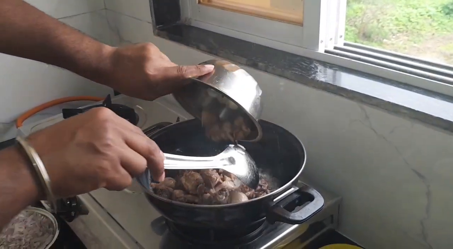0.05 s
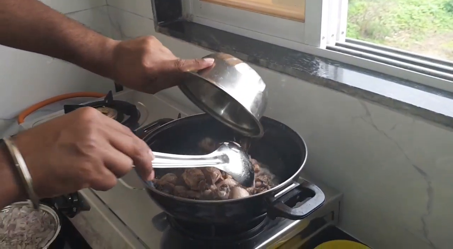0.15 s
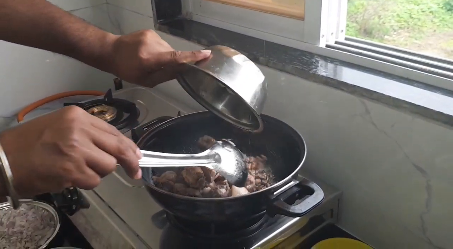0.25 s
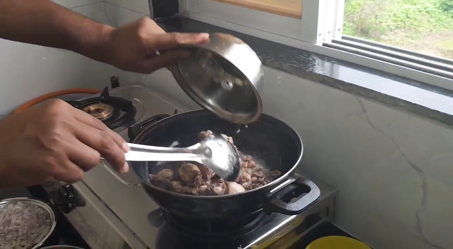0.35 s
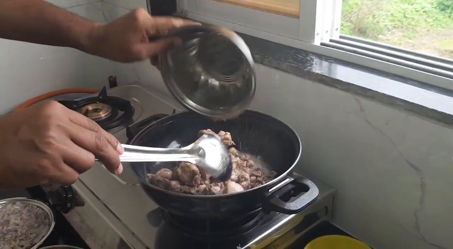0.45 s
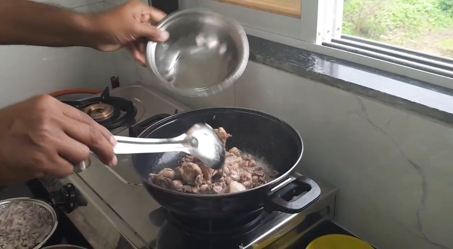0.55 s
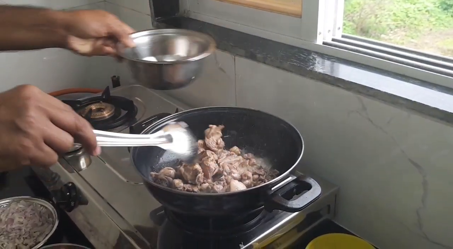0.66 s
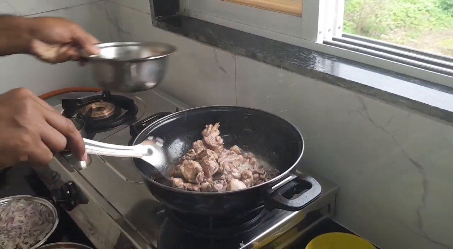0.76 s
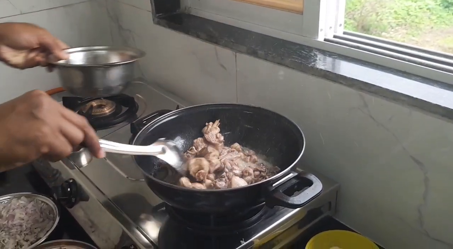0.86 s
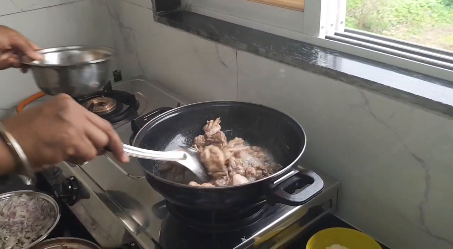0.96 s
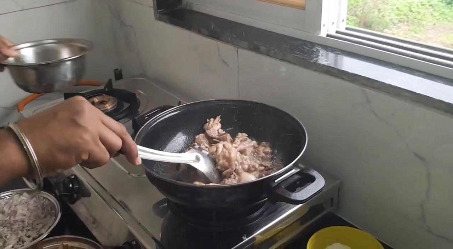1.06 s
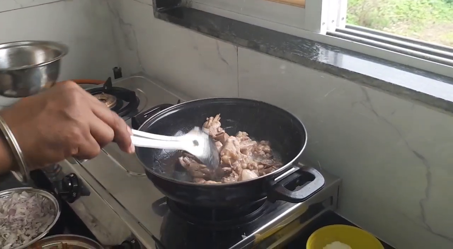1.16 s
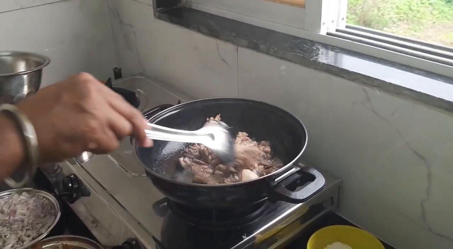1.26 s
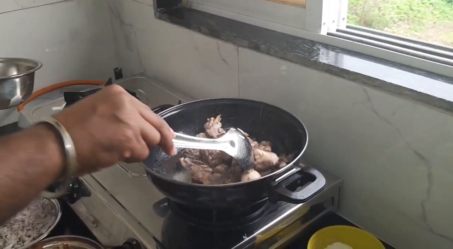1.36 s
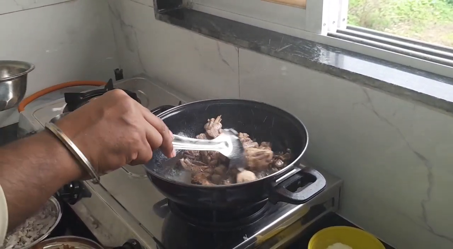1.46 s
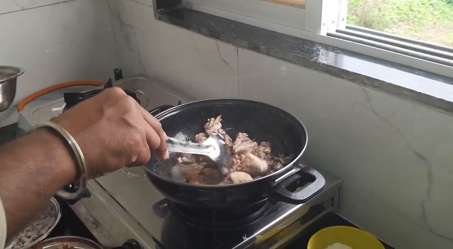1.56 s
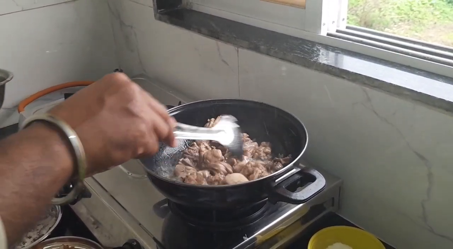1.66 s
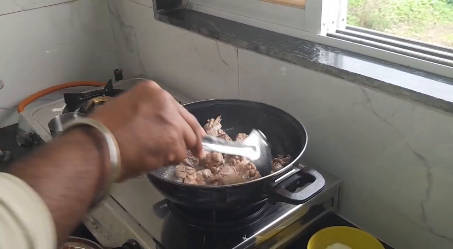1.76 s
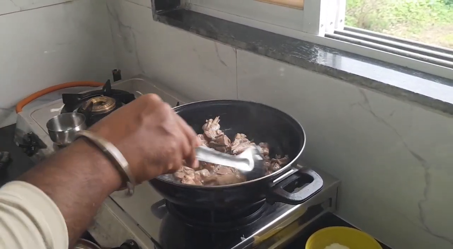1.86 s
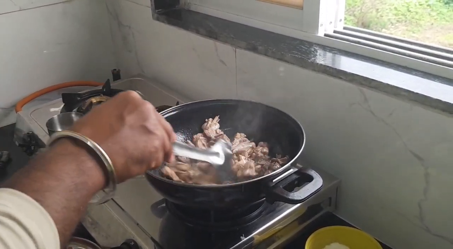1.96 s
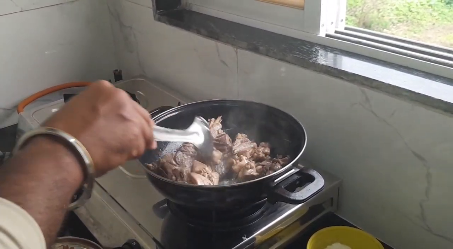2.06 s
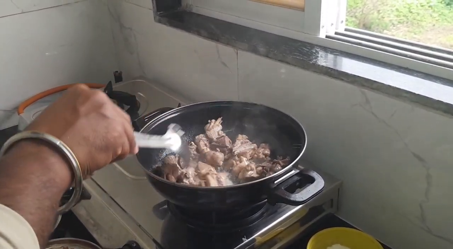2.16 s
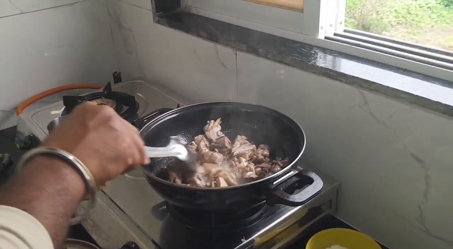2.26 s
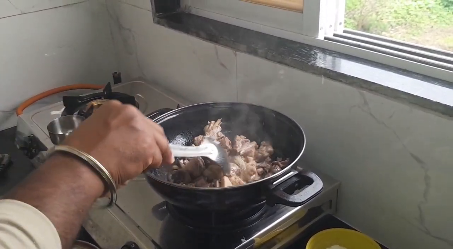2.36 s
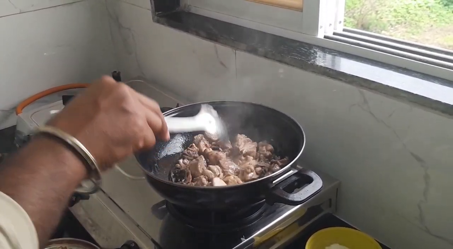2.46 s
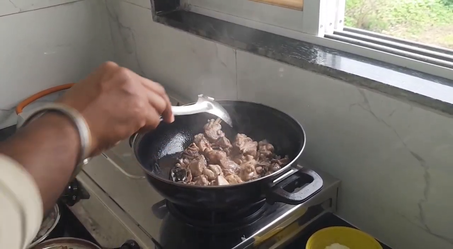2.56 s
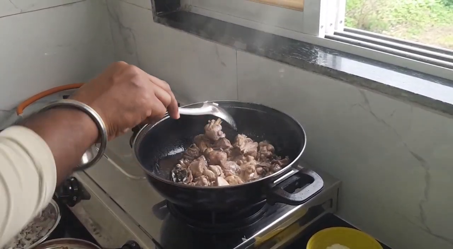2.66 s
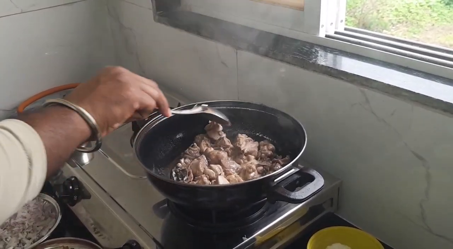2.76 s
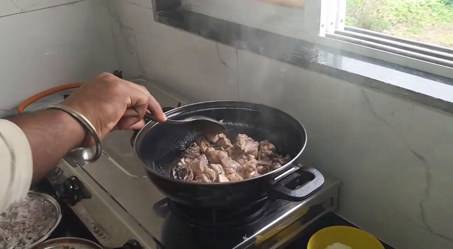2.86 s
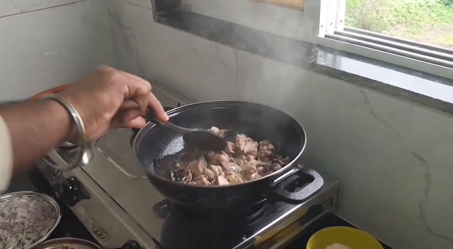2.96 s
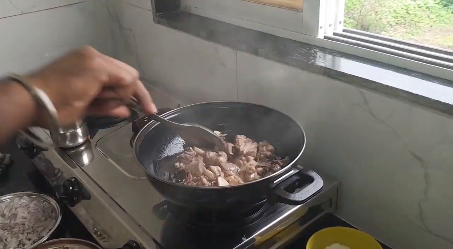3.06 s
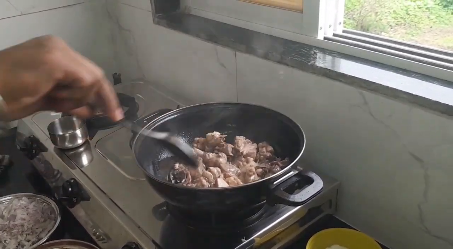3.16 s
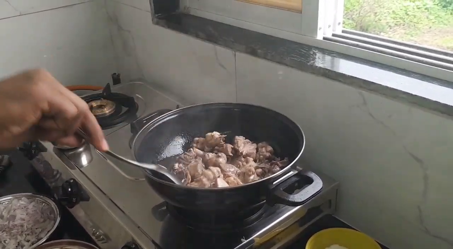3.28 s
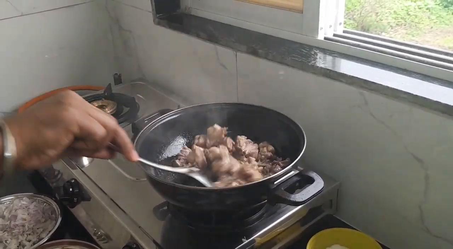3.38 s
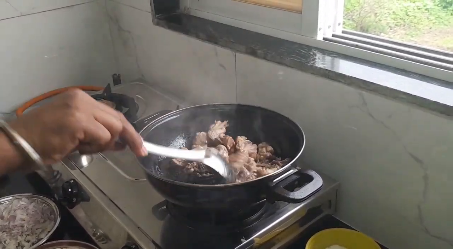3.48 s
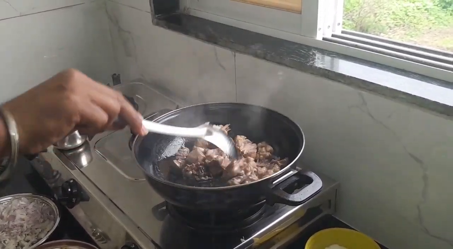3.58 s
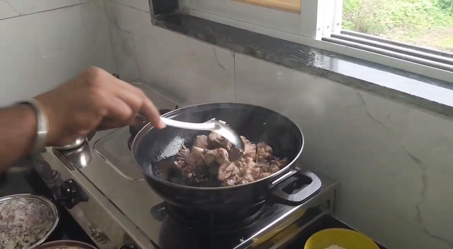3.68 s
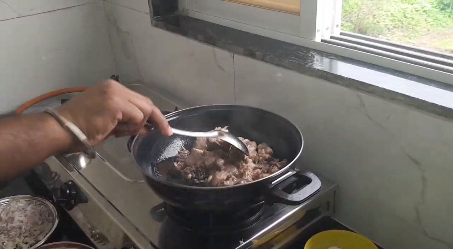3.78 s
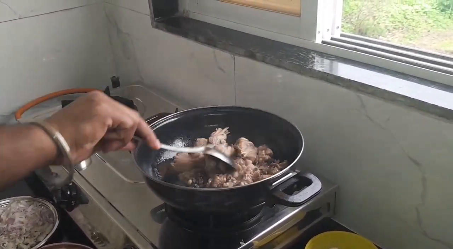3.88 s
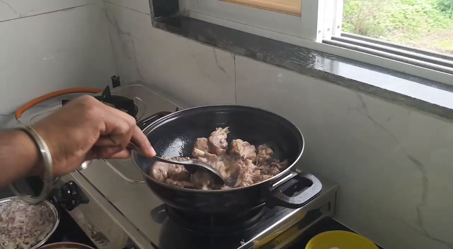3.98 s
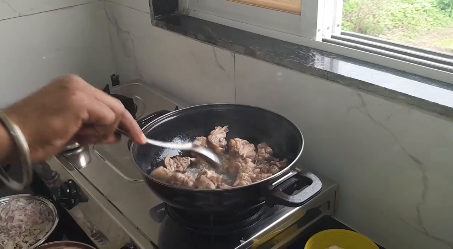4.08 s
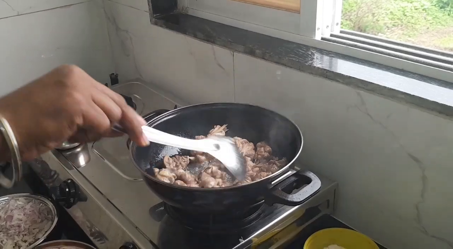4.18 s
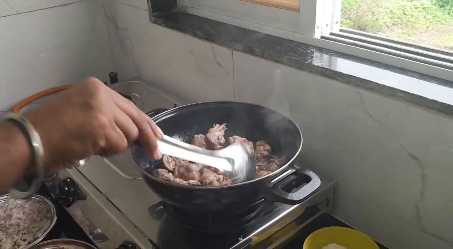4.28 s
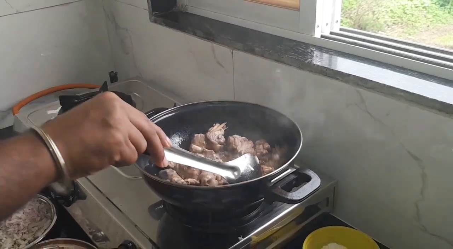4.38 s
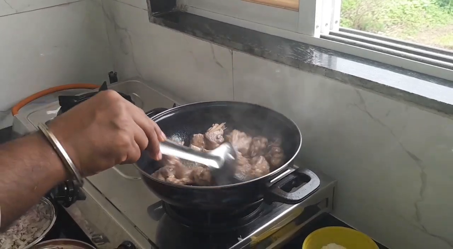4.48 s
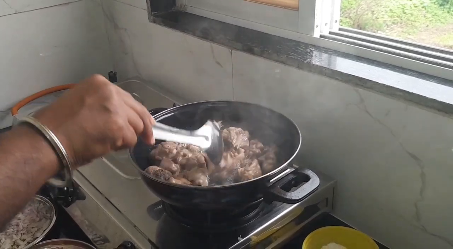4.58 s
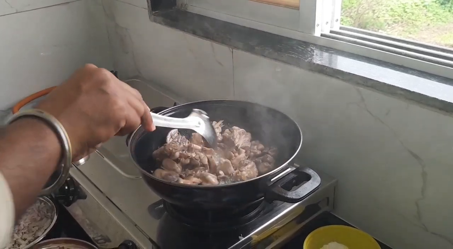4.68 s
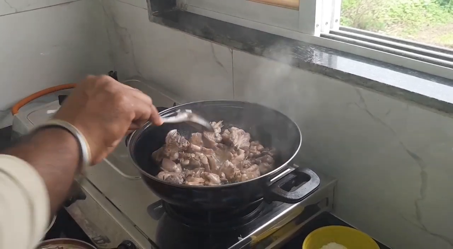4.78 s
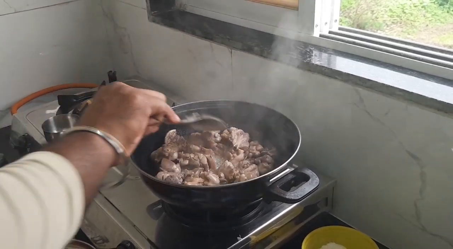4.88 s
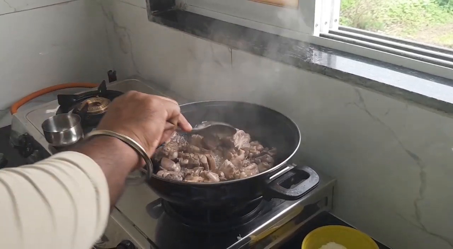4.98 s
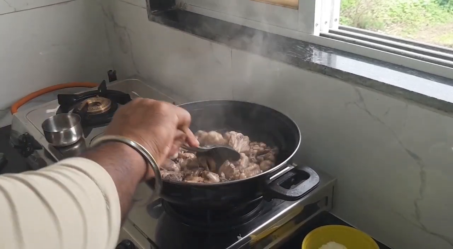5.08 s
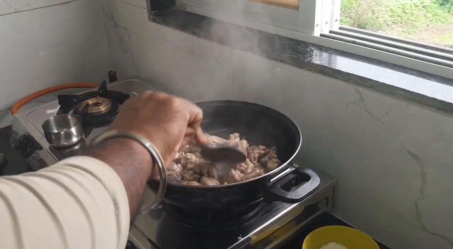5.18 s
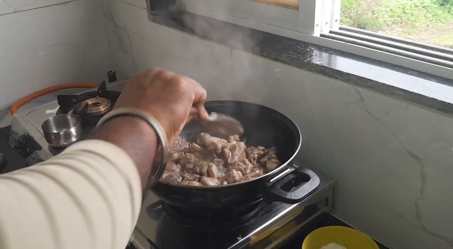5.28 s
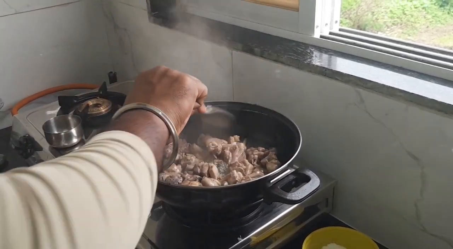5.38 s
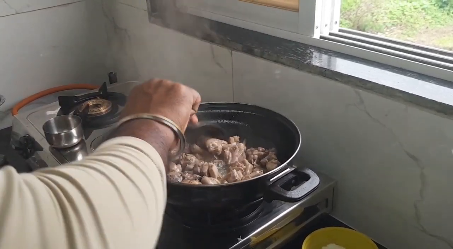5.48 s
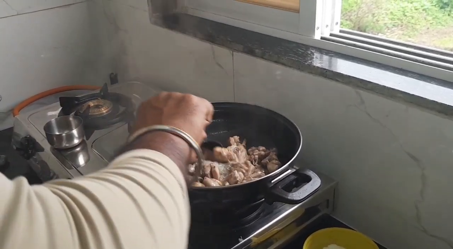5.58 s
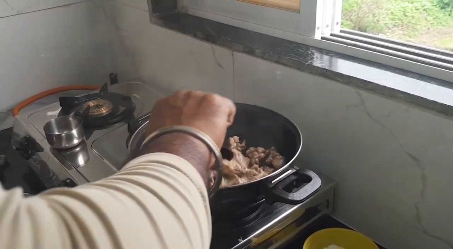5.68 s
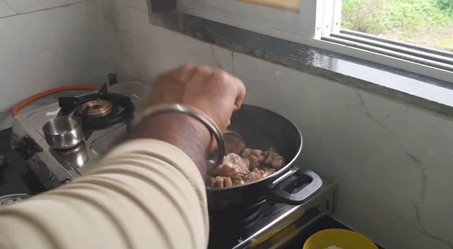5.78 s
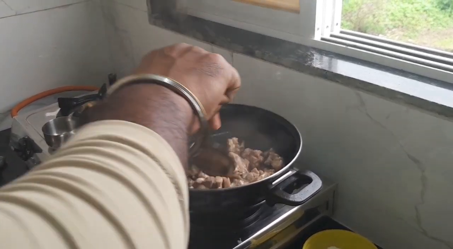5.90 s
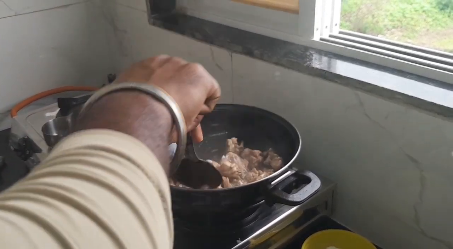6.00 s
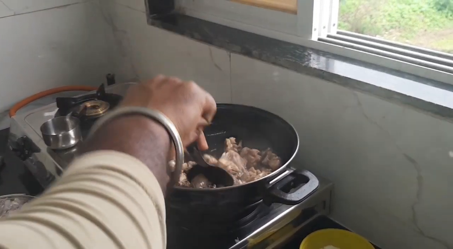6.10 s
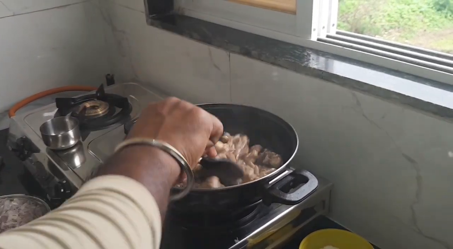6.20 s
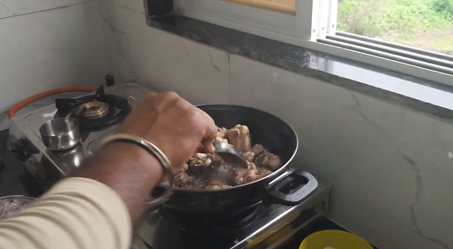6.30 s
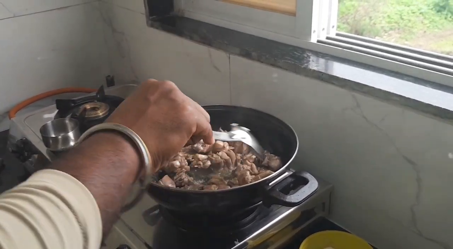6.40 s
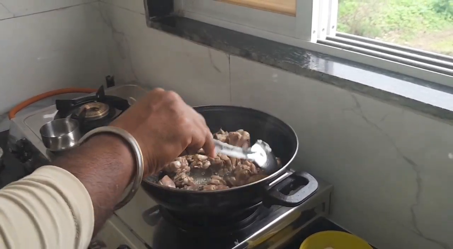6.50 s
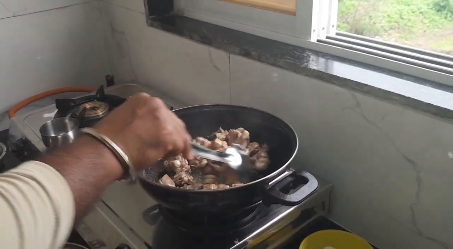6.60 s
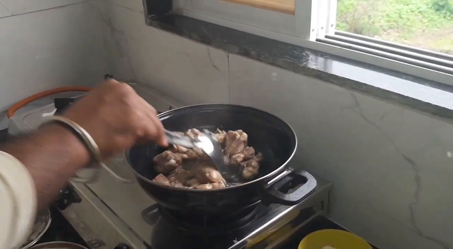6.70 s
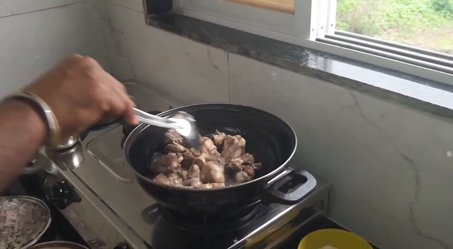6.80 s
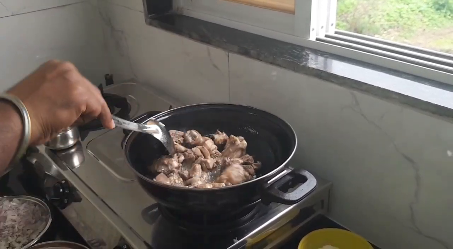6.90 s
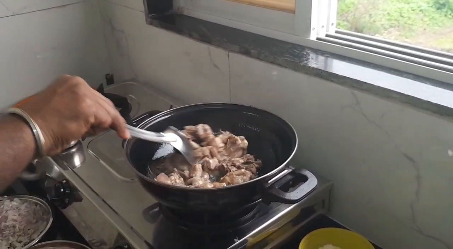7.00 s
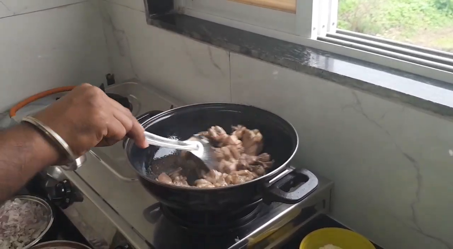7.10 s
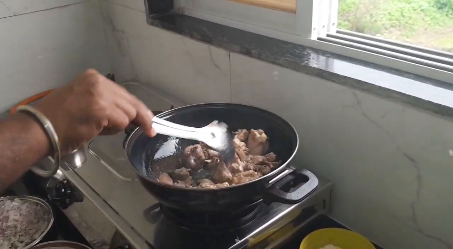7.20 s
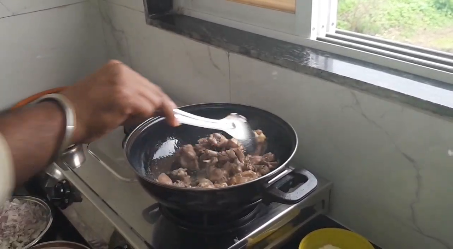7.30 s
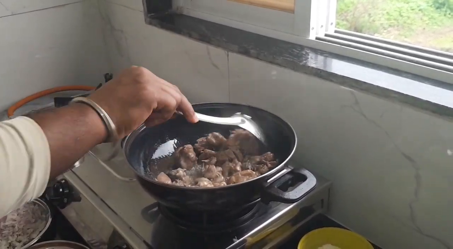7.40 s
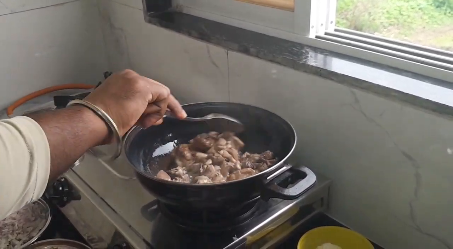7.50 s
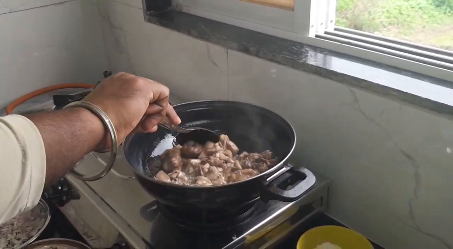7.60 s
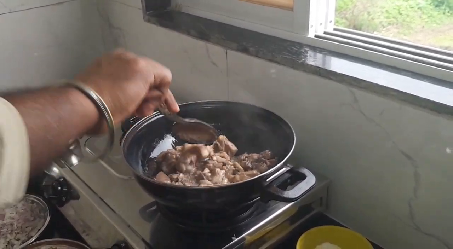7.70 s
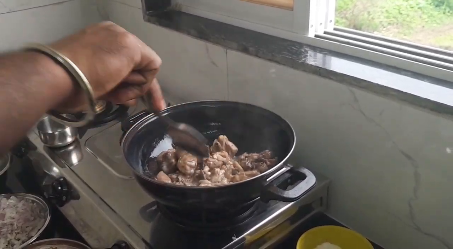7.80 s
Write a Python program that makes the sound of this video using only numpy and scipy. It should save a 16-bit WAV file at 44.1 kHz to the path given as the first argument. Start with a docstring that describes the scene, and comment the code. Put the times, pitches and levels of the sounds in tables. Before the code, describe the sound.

At 0 s a fierce, dense sizzle is already at its loudest, a bright midrange hiss full of fine crackle with bubbling underneath. It drops quickly over the first second and keeps easing until about 3 s, then stays a calmer, slowly fading fry to the end near 8 s. Light ladle contacts and short scrapes come around 1 and 1.6 s. Sharp spits pop at 2.8, 3.3, 3.9 and 4.5 s and scatter later. Clearer steel clinks and pan clacks fall at 3.2-3.35, 4.2, 5.45, 6.2 and 6.6 s, with stirring swishes clustered at 5.5-6.3 and around 7 s. Tiny steam squeaks glide at 3.2-3.5, 5.7 and 6.1 s. Low wind thumps buffet the microphone strongly from 3 to 4.6 s and 5.1 to 6.3 s, weaker afterwards. A soft low murmur and short tiled-room reverberation surround everything.

```python
"""Hot oil hisses and spits around frying chicken, fiercely at first, then calmer: filtered noise and burst trains.
A breeze from the window buffets the microphone as low-pitched noise, over a steady resonant murmur.
Water pockets spit as decaying puffs; a steel ladle stirs as swells of band noise, and clinks and knocks
on the deep pan as sums of decaying modes. Steam squeals as short glides; a small tiled kitchen reverberates.
"""
import sys
import numpy as np
from scipy import signal
from scipy.fft import rfft, irfft, next_fast_len
from scipy.io import wavfile
from scipy.ndimage import uniform_filter1d, minimum_filter1d, map_coordinates

SR = 44100
rng = np.random.default_rng(int(sys.argv[2]) if len(sys.argv) > 2 else 0)


def wav_out(sig):
    """Save sig, one row per channel (or a flat mono array), as 16-bit PCM at SR to the path in sys.argv[1]."""
    wavfile.write(sys.argv[1], SR, np.round(np.clip(np.atleast_2d(sig).T, -1, 1) * 32767).astype(np.int16))


N = 346185  # length, samples


def amp(db):
    """Decibel law: 20 dB is a tenfold amplitude."""
    return 10 ** (np.asarray(db) / 20)


def unit(x):
    """Normalisation by the root mean square."""
    return x / np.sqrt(np.mean(x ** 2) + 1e-20)


def along(points, hz):
    """Logarithmic pitch scale: interpolates (Hz, value) points over log frequency."""
    f, v = np.transpose(points)
    return np.interp(np.log(hz + 1), np.log(f + 1), v)


def curves(rows):
    """Linear interpolation: one value per sample for each column after the time."""
    s, *columns = np.transpose(rows)
    return [np.interp(np.arange(N) / SR, s, column) for column in columns]


def wobble(rate):
    """Slow random modulation: a smooth curve through `rate` random knots a second."""
    knots = rng.standard_normal(int(N * rate / SR) + 4)
    return map_coordinates(knots, [np.arange(N) * rate / SR])


def filtered(x, response):
    """Linear filtering: the spectrum of x times a response of frequency."""
    m = next_fast_len(N + SR // 2)
    return irfft(rfft(x, m) * response(np.fft.rfftfreq(m, 1 / SR)), m)[:N]


def colour(x, spectrum, size=2 ** 15):
    """Minimum-phase filtering: no answer precedes its cause, and white noise keeps its rms."""
    level_db = np.maximum(along(spectrum, np.fft.rfftfreq(size, 1 / SR)), -170)
    cepstrum = irfft(np.log(amp(level_db)), size)
    # folding the cepstrum onto positive time makes the filter causal
    cepstrum[1:size // 2] *= 2
    cepstrum[size // 2 + 1:] = 0
    fade = np.hanning(size)[size // 2:]
    impulse = irfft(np.exp(rfft(cepstrum)), size)[:size // 2] * fade
    return signal.fftconvolve(x, impulse / np.linalg.norm(impulse))[:N]


def patchy(depth_db):
    """Random spectral modulation: white noise with patches of uneven gain in time and pitch."""
    z = signal.stft(rng.standard_normal(N + 512), nperseg=256)[2]
    across_pitch = uniform_filter1d(rng.standard_normal(z.shape), 4, 0)
    field = uniform_filter1d(across_pitch, 10, 1)
    return unit(signal.istft(z * amp(depth_db * unit(field)), nperseg=256)[1][:N])


def bursts(count, spread_db, life):
    """Shot noise: scattered sudden puffs, few large and many small, whose power decays over `life` s."""
    where, size = rng.random((count, 2)).T
    energy = amp(-spread_db * np.log(size + .003)) ** 2
    starts = np.bincount((where * N).astype(int), energy, N)
    power = signal.lfilter([1], [1, -np.exp(-1 / (life * SR))], starts)
    return unit(np.sqrt(power) * rng.standard_normal(N))


def ring(modes, t, scatter_db, tilt_db=0):
    """Modal synthesis: one blow excites every mode anew; a soft blow favours the low modes."""
    out = 0
    for hz, db, t60 in modes:
        level_db = db + tilt_db * np.log2(hz / 900) + scatter_db * rng.normal()
        out = out + amp(level_db - 60 * t / t60) * np.sin(2 * np.pi * hz * t)
    return out


def add(track, s, sound):
    """Superposition: mixes a sound in at s seconds."""
    part = track[round(s * SR):][:len(sound)]
    part += sound[:len(part)]


# course of the frying, before the random boil: time_s, sizzle_db, seethe_db
FRY = [(0, -11.5, -29), (.33, -12.5, -27.5), (.65, -15, -26), (1.33, -17, -26), (2.14, -19.5, -31),
       (3.0, -21.5, -31), (4.4, -21.5, -35), (4.66, -23, -38), (5.2, -23, -35.5), (5.6, -23.5, -35.5),
       (6.16, -22.5, -37.5), (6.85, -24.5, -38), (7.32, -24.5, -37.5), (7.85, -26, -41.5)]
# bursting steam as the microphone colours it: pitch_hz, density_db (per Hz, relative)
SIZZLE = [(530, -44.5), (900, -13.5), (961, -24.5), (1140, -7.5), (1450, -14), (1680, -6.5), (2550, -2.5),
          (3630, 2), (5520, -11), (6840, -16), (8310, -30), (10800, -51), (18300, -120)]
# large slow bubbles under the meat: pitch_hz, density_db (per Hz, relative)
SEETHE = [(180, -42), (300, -20), (385, -21.5), (547, -18), (691, -1), (909, -8), (1140, -5), (2200, -5),
          (2860, -27), (4840, -120)]
# finest droplets: pitch_hz, density_db (per Hz, relative)
SPRAY = [(7000, -40), (8500, -7.5), (10000, -12), (11000, -9), (12000, -2.5), (13200, -13), (14200, -10),
         (15700, -13), (18000, -11.5)]
# modes of the pan wall: pitch_hz, level_db, t60_s
PAN = [(411, -12, 0.33), (468, -18, 0.46), (633, -6, 0.065), (702.5, -1, 0.16), (830, -5, 0.44),
       (1060, -15, 0.34), (1085, -9, 0.51), (1180, -1, 0.13), (1268, -5, 0.36), (1347, -5, .15),
       (1690, -2, 0.12), (2100, -16, 0.048), (2456, 6, 0.066)]
SPRAY_DB, SPRAY_GROWS = -54.5, 1.07  # spray at the mean sizzle, dB; dB of spray per dB of sizzle


def frying():
    """Shot noise of bubble bursts in three sizes; forced vibration keeps the pan wall ringing."""
    sizzle_db, seethe_db = curves(FRY)
    spray_db = SPRAY_DB + SPRAY_GROWS * (sizzle_db - sizzle_db.mean())
    boil_db = 0.32 * wobble(8) + 0.34 * wobble(25)
    small = bursts(count=16000, spread_db=3.0, life=0.00095)
    sizzle = unit(colour(patchy(0.93) + 0.6 * small, SIZZLE))
    spray = unit(colour(patchy(1.2) + .5 * small, SPRAY))
    large = patchy(0.24) + 0.75 * bursts(count=2500, spread_db=2.0, life=0.0028)
    seethe = colour(large, SEETHE)
    wall = signal.fftconvolve(seethe, ring(PAN, np.arange(SR // 2) / SR, 0))[:N]
    low = unit(seethe + 0.31 * unit(wall))
    return amp(boil_db) * (amp(sizzle_db) * sizzle + amp(seethe_db) * low + amp(spray_db) * spray)


# buffeting between gusts, before the random lumps: time_s, level_db
BREEZE = [(0, -50.5), (.8, -49), (.9, -47), (1.3, -41.5), (1.75, -48), (1.85, -52), (2.3, -48.5),
          (2.7, -45), (3.2, -39), (4.9, -46), (5.4, -40), (5.75, -44), (7.2, -45), (7.4, -45), (7.85, -38)]
# gusts: middle_s, length_s (at half strength), buffet_db, edge_db
GUSTS = [(0.885, 0.034, -44, -54), (1.162, 0.047, -43, -51), (1.24, 0.043, -41.5, -46),
         (1.71, 0.043, -44, -50), (2.721, 0.039, -40, -55.0), (2.878, 0.061, -41, -49.0),
         (3.003, 0.1, -32.0, -43), (3.128, 0.049, -27, -26.5), (3.224, 0.048, -27.3, -32.8),
         (3.352, 0.043, -34, -39.7), (3.52, 0.072, -24.5, -35), (3.732, 0.053, -24.9, -24),
         (3.84, 0.081, -30, -41), (4.02, 0.051, -42, -40.6), (4.25, 0.056, -29.9, -40.7),
         (4.363, 0.039, -34.4, -44), (4.457, 0.055, -31.5, -40.2), (4.627, 0.056, -39, -55),
         (4.742, 0.04, -43, -50), (4.98, 0.043, -42, -46), (5.111, 0.115, -39, -40),
         (5.252, 0.065, -32.5, -38.1), (5.368, 0.064, -32.5, -33), (5.454, 0.039, -26.5, -28),
         (5.527, 0.05, -28, -34), (5.702, 0.076, -34, -40), (5.814, 0.072, -29.5, -31.5),
         (6.015, 0.052, -35, -55.0), (6.117, 0.034, -31, -42), (6.165, 0.04, -29, -38),
         (6.2, 0.032, -28, -31.5), (6.24, 0.046, -29, -44), (6.406, 0.047, -35.5, -46.7),
         (6.495, 0.038, -35.2, -55.0), (6.785, 0.051, -38, -52), (6.907, 0.055, -37, -58),
         (7.006, 0.055, -30, -39.5), (7.14, 0.051, -34.5, -50), (7.525, 0.069, -40, -46.8),
         (7.685, 0.094, -33.8, -38.2), (7.821, 0.025, -40, -50)]
# spectrum of the buffeting: pitch_hz, density_db (per Hz, relative)
BUFFET = [(12, -42), (20, -23), (41, -1), (64, 5.5), (119, 0), (180, -11.5), (230, -26), (400, -120)]
# spectrum of a gust's hard edge: pitch_hz, density_db (per Hz, relative)
EDGE = [(40, -58), (80, -24), (130, -1), (200, -2), (320, -11), (500, -32), (1000, -150)]
LUMPS_DB, LUMPS_PER_S = 2, 14  # depth and pace of the random buffeting
EDGE_SHARE = .7  # the hard edge lasts this part of its gust


def wind():
    """Turbulence noise: the breeze buffets in lumps; gusts thump, with a shorter, higher-reaching edge."""
    breeze_db, = curves(BREEZE)
    low = unit(colour(rng.standard_normal(N), BUFFET))
    edge = unit(colour(rng.standard_normal(N), EDGE))
    out = amp(breeze_db + LUMPS_DB * wobble(LUMPS_PER_S)) * low
    for s, length, buffet_db, edge_db in GUSTS:
        for noise, span, db in (low, length, buffet_db), (edge, EDGE_SHARE * length, edge_db):
            swell = np.hanning(round(2 * span * SR))
            puff = swell * noise[round((s - span) * SR):][:len(swell)]
            add(out, s - span, amp(db) * unit(puff) / unit(swell).max())
    return out


# room resonances in the murmur of burner flame and outside air: pitch_hz, width_hz, level_db
KITCHEN = [(112, 13, -1), (202.5, 10.3, 0), (253, 18, 1), (308, 31, -4), (351, 21, -2), (384, 9.2, 3.5),
           (465, 45, 1), (577, 78, -1.5)]


def air():
    """Room resonance: steady noise is strongest at the kitchen's modes."""
    def room(f):
        power = sum(amp(db) ** 2 / (1 + ((f - hz) / (w / 2)) ** 2) for hz, w, db in KITCHEN)
        band_edges = 1 + (f / 700) ** 4 + (75 / (f + 1)) ** 4
        return np.sqrt(power) / band_edges
    return amp(-41.5) * unit(filtered(patchy(0.75), room))


# spits of oil, before colouring: start_s, treble_db, body_db
SPITS = [(0.0712, -39, -26), (0.599, -41, -23.5), (0.6908, -41, -26), (1.4794, -46, -25.5),
         (1.669, -48, -20.5), (2.5232, -46, -28.5), (2.6693, -49, -27), (2.788, -42, -16),
         (3.3094, -49, -15), (3.7365, -47, -30.5), (3.8665, -45, -21.5), (3.9444, -48.5, -15),
         (4.0477, -48, -24), (4.3545, -42, -29.5), (4.54, -49, -14), (6.1485, -51, -26), (6.542, -45, -18),
         (6.5894, -50, -17), (6.7594, -50, -20), (7.1684, -52, -25), (7.359, -55, -20), (7.4394, -50, -24)]
# treble of spits and ladle contacts: pitch_hz, density_db (per Hz, relative)
CRACK = [(7000, -33), (8500, -14), (10000, -14), (11000, -8), (12000, 1), (13200, -8), (15700, -8),
         (18000, -11)]
SPIT_T60_S = 0.041


def spits():
    """Impulsive release: a water pocket bursts out of the oil as a sudden puff that dies exponentially."""
    fine, body, t = np.zeros(N), np.zeros(N), np.arange(SR // 5) / SR
    for s, treble_db, body_db in SPITS:
        puff = amp(-60 * t / SPIT_T60_S) * rng.standard_normal(len(t))
        add(fine, s, amp(treble_db) * puff)
        add(body, s, amp(body_db) * np.clip(t / 0.0017, 0, 1) * puff)
    return colour(fine, CRACK) + colour(body, SIZZLE)


# the ladle drags through meat and oil: start_s, length_s, centre_hz, level_db
STROKES = [(0.977, .06, 1610, -20), (1.474, 0.034, 2500, -25), (1.597, 0.037, 1500, -22),
           (1.664, 0.036, 2600, -18.5), (3.028, 0.037, 2840, -19), (3.34, 0.099, 3800, -23.5),
           (3.422, 0.067, 2150, -24), (4.26, .04, 2000, -33), (4.326, 0.13, 794, -35),
           (5.472, 0.12, 895, -26.5), (5.576, 0.043, 2800, -26), (5.69, 0.1, 3220, -28),
           (5.808, 0.11, 3430, -26), (6.01, 0.12, 3530, -27.5), (6.13, 0.17, 2100, -27.5),
           (6.576, 0.033, 2700, -30), (6.741, 0.073, 3520, -24), (7.027, 0.12, 1100, -36),
           (7.035, 0.072, 3400, -29), (7.153, 0.065, 3280, -25.5), (7.57, 0.091, 895, -32)]
# the microphone's colour on strokes and contacts: pitch_hz, level_db (relative)
MICROPHONE = [(200, -1), (5000, 6), (7500, -0.5), (10000, -30), (12000, -19), (16000, -33)]
STROKE_SPREAD_HZ = 1850  # width of a stroke's band around its centre


def strokes():
    """Friction noise: stirring swells as grainy rubbing and released steam, each around its own pitch."""
    out = np.zeros(N)
    grit = patchy(4.4) + 0.56 * bursts(count=6000, spread_db=3.5, life=0.0018)
    for s, length, centre_hz, db in STROKES:
        n = round(length * SR)
        hz = np.fft.rfftfreq(n, 1 / SR)
        octaves = np.log2(hz / centre_hz + 1e-9)
        bell = np.exp(-(octaves * centre_hz / STROKE_SPREAD_HZ) ** 2)
        rubbing = rfft(grit[round(s * SR):][:n])
        band = irfft(rubbing * amp(along(MICROPHONE, hz)) * bell, n)
        swell = np.sin(np.pi * np.sqrt(np.linspace(0, 1, n)))  # rises faster than it falls
        add(out, s, amp(db) * swell * unit(band))
    return out


# ladle contacts, before colouring:
# start_s, pan_db, clink_db, crack_db (treble), hardness_db (per octave), clack_db
KNOCKS = [(0.986, -31, -39.5, -60, -3, -28), (1.162, -36, -44.5, -52, 8, -28),
          (1.61, -29, -39, -58, 1, -32), (3.213, -47, -36, -48, -7, -26), (3.252, -43, -15, -41, 0, -19),
          (3.346, -25.5, -26, -42, -3, -15.5), (3.887, -32, -54.5, -60, -1, -29),
          (4.226, -28.5, -21, -49, -4, -19), (4.26, -29, -26, -54, -7, -23),
          (5.452, -22.5, -25, -38, -4.5, -14), (6.166, -30, -30.5, -65, -2, -23),
          (6.613, -21, -29, -61, -5.5, -21), (6.641, -26, -38.5, -65, -6.5, -24),
          (7.024, -34, -45, -62, -11, -35)]
# modes of the steel ladle: pitch_hz, level_db, t60_s
LADLE = [(2681, -4, .035), (3420, 3, .04), (4570, 0, .055), (5227, -10, .045), (5900, -5, .045),
         (6557, -10, .045), (6900, -12, .045), (12070, -18, .08), (13000, -16, .05), (15000, -12, .05)]
LANDING_S = .002  # time over which the wet ladle edge lands
CLACK_FOLLOWS = 0.26  # share of a contact's hardness that colours its clack


def ladle():
    """Impact excitation: each contact rings pan and ladle with a dry clack; food damps the pan quickly."""
    rings, cracks, clacks = np.zeros(N), np.zeros(N), np.zeros(N)
    t = np.arange(SR // 3) / SR
    press = np.clip(t / LANDING_S, 0, 1)
    octave = np.log2(np.maximum(np.fft.rfftfreq(len(t), 1 / SR), 900) / 2500)
    snap = 1 + 0.4 * amp(-60 * ((t - LANDING_S) / 0.0017) ** 2)  # the instant of full contact
    for s, pan_db, clink_db, crack_db, hard_db, clack_db in KNOCKS:
        steel = ring(LADLE, t, 1.5)
        wall = ring(PAN, t, 2.5, hard_db)
        damped_wall = amp(pan_db - 60 * t / 0.19) * wall
        add(rings, s, press * (amp(clink_db) * steel + damped_wall))
        noise = rng.standard_normal(len(t))
        add(cracks, s, amp(crack_db - 60 * t / 0.082) * noise)
        tilted = irfft(rfft(noise) * amp(CLACK_FOLLOWS * hard_db * octave), len(t))
        add(clacks, s, amp(clack_db - 60 * t / 0.041) * press * snap * tilted)
    return colour(rings, MICROPHONE) + colour(cracks, CRACK) + colour(clacks, MICROPHONE)


# gliding squeals of steam, before roughening: start_s, length_s, start_hz, end_hz, level_db
SQUEALS = [(3.211, 0.016, 2210, 2080, -20), (3.352, 0.06, 4200, 3190, -22), (3.447, 0.022, 2200, 2000, -20),
           (5.702, 0.035, 3490, 2950, -23), (5.732, 0.011, 2330, 2180, -21),
           (6.061, 0.041, 3040, 3440, -25), (6.14, 0.027, 2240, 1844, -23)]


def squeals():
    """Frequency glide with amplitude modulation: steam squeezes out under the meat in short rough tones."""
    out, rough = np.zeros(N), 1 + .5 * wobble(700)
    for s, length, start_hz, end_hz, db in SQUEALS:
        u = np.linspace(0, 1, round(length * SR))
        phase = 2 * np.pi * np.cumsum(start_hz + (end_hz - start_hz) * u) / SR
        add(out, s, amp(db) * np.sin(np.pi * u) * np.sin(phase))
    return rough * out


# decay of the tiled room: pitch_hz, t60_s
TILES = [(300, 1), (3000, 0.28), (12000, 0.18)]


def tiles(x):
    """Reverberation: the kitchen answers after a short delay, each frequency dying at its own speed."""
    hz, t, z = signal.stft(rng.standard_normal(SR // 3), SR, nperseg=256)
    decay = amp(-60 * t / along(TILES, hz)[:, None])
    tail = signal.istft(z * decay, SR, nperseg=256)[1]
    delayed = np.pad(x, (200, 0))  # samples
    return signal.fftconvolve(delayed, tail / np.linalg.norm(tail))[:N]


def scene():
    """Superposition of direct sound, reverberation, wind and murmur."""
    hits = ladle() + spits() + squeals() + strokes()
    fry = frying()
    room = tiles(amp(-14) * fry + amp(-10) * hits)
    return (fry + hits + room + wind() + air())[None]


TOP_HZ = 15720  # band limit


def record(dry):
    """Peak limiting, then band limiting: a smooth gain holds the peaks and the top is cut."""
    need = np.minimum(1, .94 / (np.abs(dry[0]) + 1e-9))
    gain = uniform_filter1d(minimum_filter1d(need, size=257), size=129)
    return filtered(gain * dry[0], lambda hz: hz < TOP_HZ)[None]


dry = scene()
out = record(dry)
wav_out(out)
```